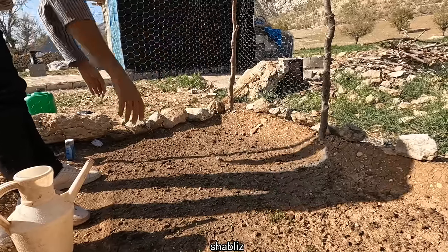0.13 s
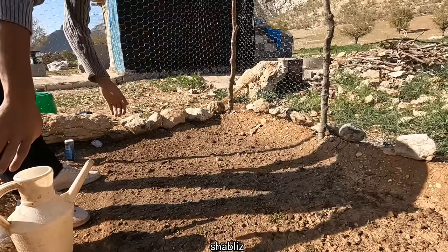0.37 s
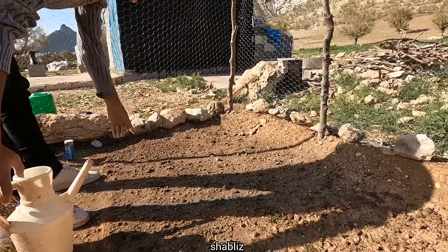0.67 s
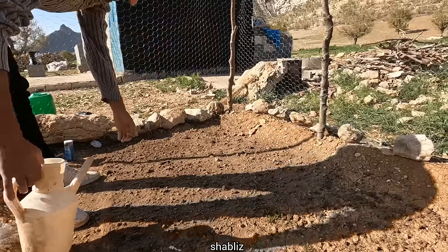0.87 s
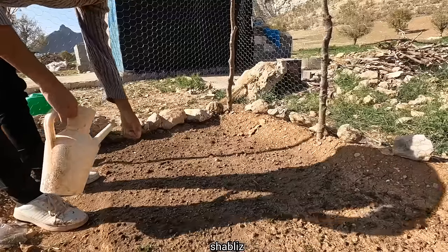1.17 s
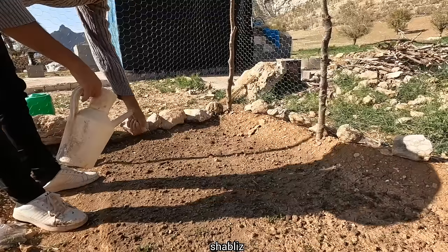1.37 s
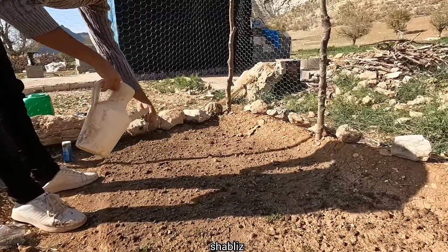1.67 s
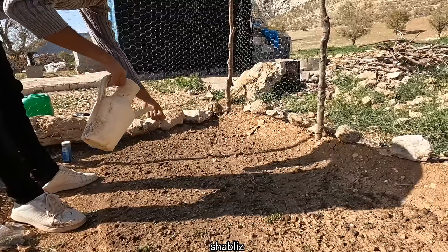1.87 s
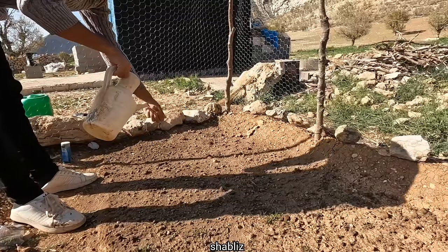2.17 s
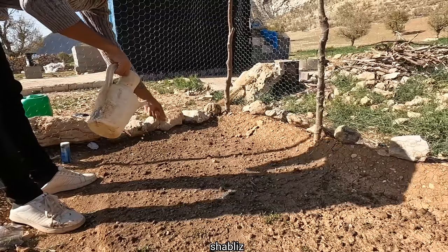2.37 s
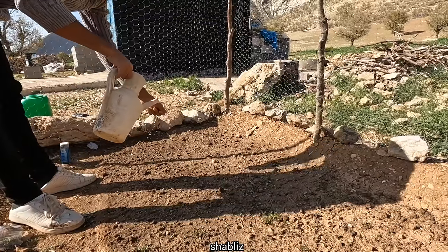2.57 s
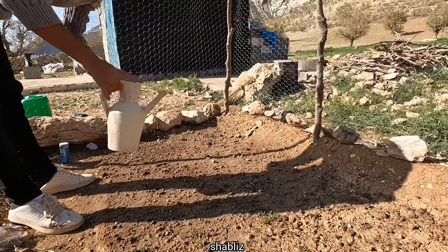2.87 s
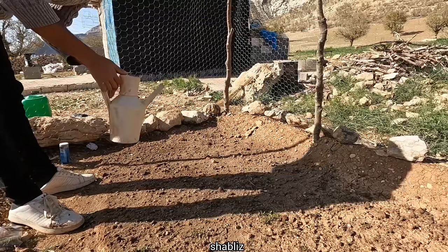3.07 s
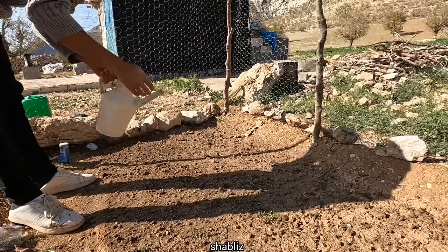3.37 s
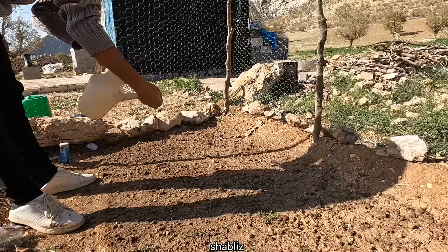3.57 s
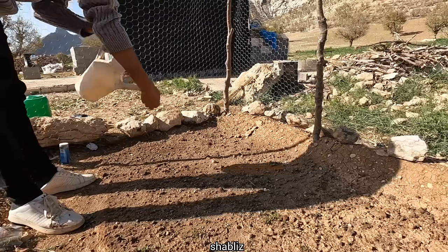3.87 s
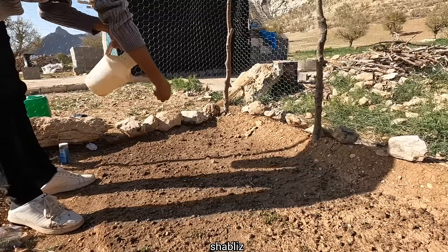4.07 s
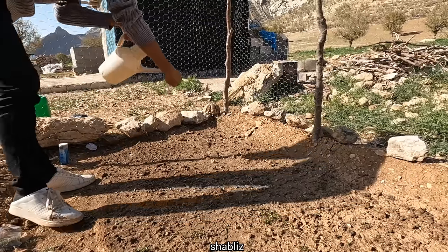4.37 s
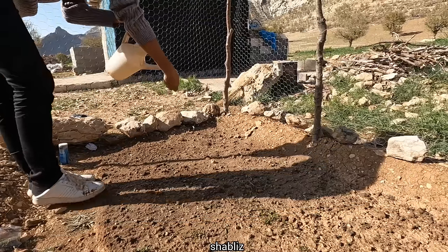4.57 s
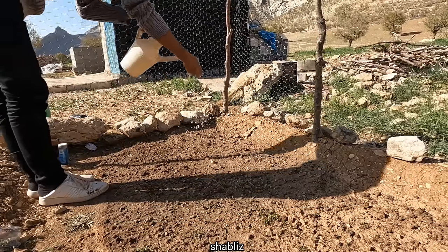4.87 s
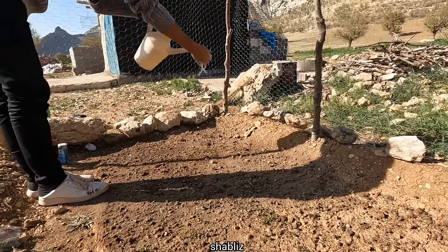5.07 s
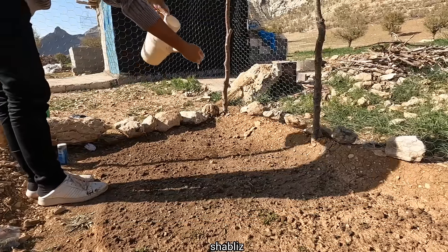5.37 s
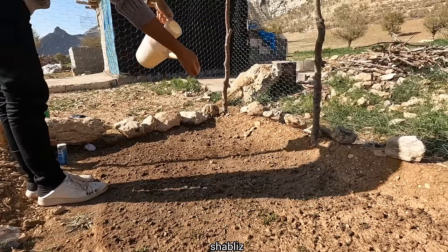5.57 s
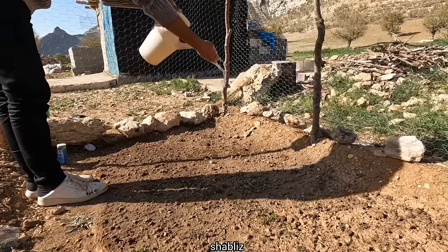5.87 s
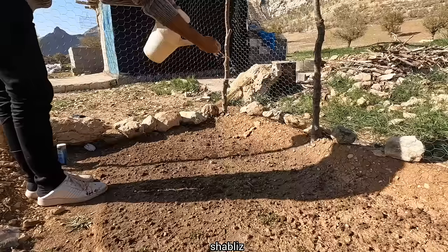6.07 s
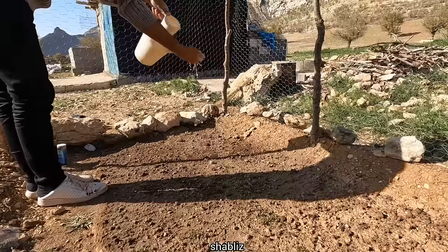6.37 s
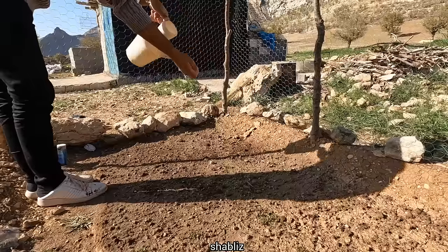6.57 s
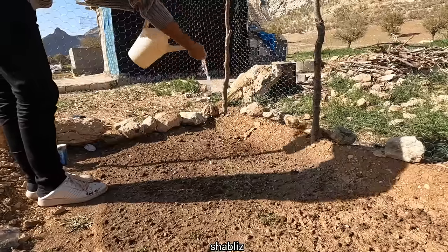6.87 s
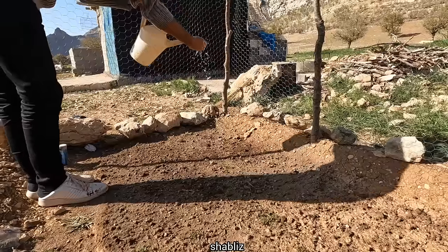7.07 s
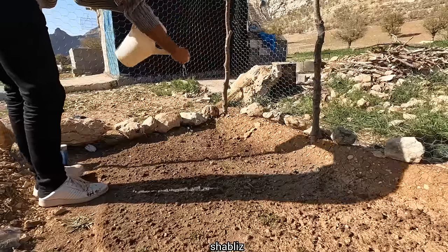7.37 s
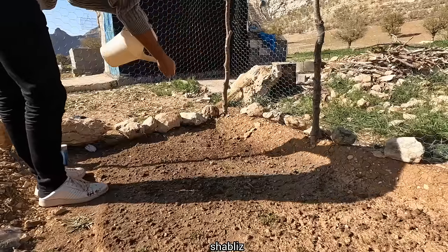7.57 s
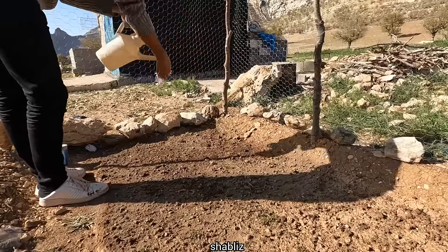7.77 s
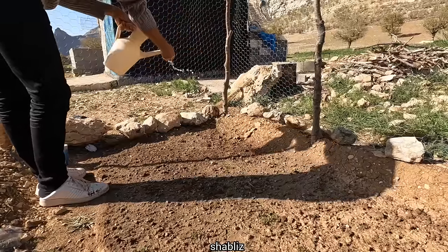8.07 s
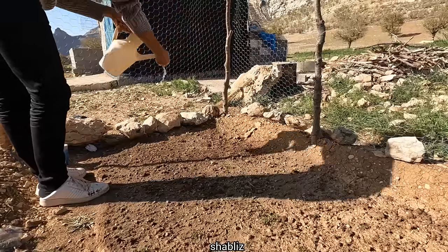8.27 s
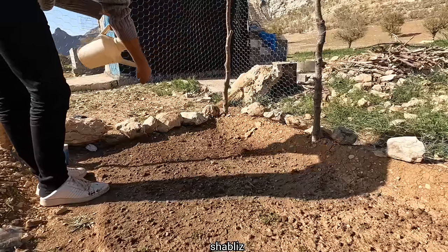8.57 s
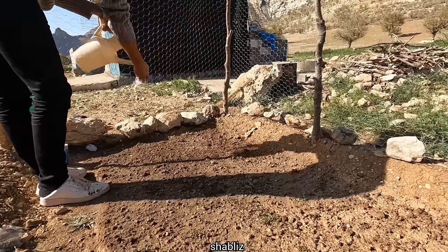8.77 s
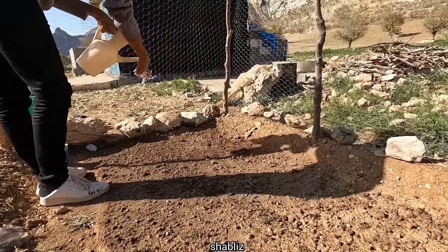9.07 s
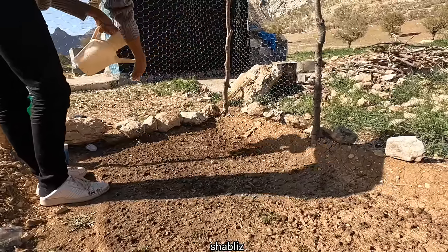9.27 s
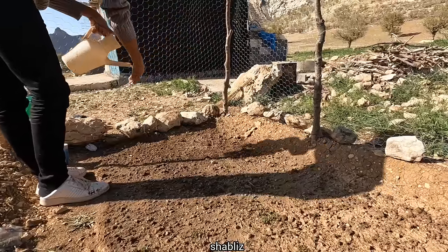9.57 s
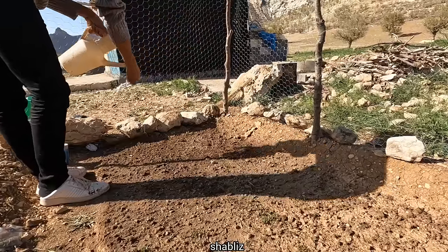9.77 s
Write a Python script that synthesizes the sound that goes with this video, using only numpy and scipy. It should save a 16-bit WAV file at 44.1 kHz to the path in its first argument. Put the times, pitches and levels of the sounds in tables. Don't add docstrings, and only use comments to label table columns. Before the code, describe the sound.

Water sprinkled in handfuls from a plastic jug patters and smacks on dry dug soil, with hollow jug knocks and low wind buffeting.

```python
import sys
import numpy as np
from scipy import signal
from scipy.fft import rfft, irfft, next_fast_len
from scipy.io import wavfile
from scipy.ndimage import uniform_filter1d

SR = 44100
rng = np.random.default_rng(int(sys.argv[2]) if len(sys.argv) > 2 else 0)


def elevation(decibels):
    levels = np.asarray(decibels, float)
    return 10 ** (levels / 20)


def transcribe(u):
    v = np.clip(np.atleast_2d(u).T, -1, 1)
    q = np.round(v * 32767).astype(np.int16)
    wavfile.write(sys.argv[1], SR, q)


N = 437913

# frequency_hz, level_db per Hz
IMPACT_SPECTRUM = [(1000, -19.5), (2700, -5), (4500, -1.5), (6500, -2.5), (7800, -0.5), (8500, -9.5),
                   (9200, -19.5), (10300, -13), (11200, -21.5), (12300, -16), (13500, -25.5), (15200, -71),
                   (16500, -80)]
# start_s, length_s, fine_patter_db, coarse_over_fine_db
HANDFULS = [(1.916, 0.17, -68, -12), (2.167, .13, -66.5, -13.5), (2.415, 0.175, -65, -11),
            (2.65, 0.071, -65.5, -12.5), (2.825, 0.34, -63.5, -11.5), (3.198, .12, -56.5, -7),
            (3.361, .14, -55.5, -11.5), (3.52, 0.4, -62, -19.5), (4.349, 0.2576, -66, -2.5),
            (4.75, 0.074, -58, -8.5), (4.86, 0.37, -59.5, -14.5), (5.35, .06, -70, -9),
            (5.47, 0.051, -64.5, -10), (5.559, 0.043, -72.5, -20), (5.791, 0.36, -64.5, -7),
            (6.198, 0.078, -58.5, -5.5), (6.331, .14, -64, -8.5), (6.509, 0.076, -65.5, -15),
            (6.661, 0.085, -64, -9), (6.82, 0.14, -57, -17.5), (7.18, .14, -60.5, -9.5),
            (7.388, .04, -65, -7), (7.5, 0.119, -63, -7.5), (7.7, .35, -64, -12), (8.07, .38, -62.5, -8),
            (8.569, 0.19, -66, -11), (8.86, 0.21, -66.5, -14), (9.131, 0.18, -62.5, -10),
            (9.357, .26, -57.5, -7.5), (9.661, 0.23, -65.5, -11)]
LAND_S = 0.03
SEEP_START_S = 4.36


def at_hz(points, hz):
    points_hz, level = np.transpose(points)
    return np.interp(np.log(np.maximum(hz, 1)), np.log(points_hz), level)


def rms_one(x):
    return x / np.sqrt(np.mean(x ** 2) + 1e-20)


def band(x, low_hz, high_hz, order=2):
    return signal.sosfilt(signal.butter(order, [low_hz, high_hz], "band", fs=SR, output="sos"), x)


def coloured(x, spectrum):
    size = next_fast_len(N)
    gain = elevation(at_hz(spectrum, np.fft.rfftfreq(size, 1 / SR)))
    return irfft(rfft(x, size) * gain, size)[..., :N]


def drift(rate_hz):
    r = np.exp(-2 * np.pi * rate_hz / SR)
    noise = rng.standard_normal(N + SR)
    return rms_one(signal.lfilter([1], [1, -2 * r, r * r], noise)[SR:])


def resonate(x, hz, width_hz):
    r = np.exp(-np.pi * width_hz / SR)
    return signal.lfilter([1, 0, -1], [1, -2 * r * np.cos(2 * np.pi * hz / SR), r * r], x)


def add(out, start_s, burst, peak_db):
    i = max(round(start_s * SR), 0)
    out[i:i + len(burst)] += (elevation(peak_db) * burst / np.abs(burst).max())[:N - i]


def stretch(coarse):
    return np.interp(np.arange(N) / 64, np.arange(len(coarse)), coarse)


def grains(per_s, spread_db, low_hz, high_hz, cycles):
    sizes = elevation(spread_db * np.minimum(rng.exponential(1, (2, N)), 5))
    signed = sizes * rng.choice([-1, 1], (2, N))
    born = signed * (rng.random((2, N)) < per_s / SR)
    dealt = rng.integers(0, 14, (2, N))
    pitches = np.geomspace(low_hz, high_hz, 14)
    out = sum(resonate(born * (dealt == k) + 1e-18, hz, hz / cycles) for k, hz in enumerate(pitches))
    return out / np.sqrt(uniform_filter1d(out ** 2, size=8000) + 1e-12)


def open_air():
    # frequency_hz, level_db per Hz
    air_spectrum = [(90, -26), (150, 7), (340, -2), (700, -12.5), (1300, -12.5), (3000, -25.5),
                    (5500, -22.5), (7600, -15.5), (8500, -29.5), (9300, -32), (12500, -38), (14500, -44),
                    (16500, -87)]
    noise = rms_one(coloured(rng.standard_normal((2, N)), air_spectrum))
    return elevation(-68 + 1.8 * drift(7)) * noise


def gusts():
    # peak_s, buffet_db, fade_s (time to fall by 10 dB), flutter_over_buffet_db
    gust_table = [(.16, -40.5, .12, -21), (.42, -44, 0.04, -24), (.9, -36, .1, -23.5),
                  (1.12, -46.5, 0.01, -16), (1.45, -36.5, 0.08, -18.5), (1.68, -42, 0.25, -30.5),
                  (1.92, -31.5, 0.1, -24), (2.08, -28.5, 0.08, -11), (2.5, -42.5, .2, -13),
                  (2.85, -38.5, 0.27, -16), (3.11, -33, 0.02, -5), (3.28, -41.5, 0.08, -11.5),
                  (3.57, -39, 0.1, -25), (3.72, -35, 0.1, -23), (4.1, -46, 0.4, -17.5),
                  (4.92, -42.5, 0.13, -12), (5.28, -44, 0.17, -11), (5.47, -27, .08, -14),
                  (5.68, -26.5, 0.0351, -3.5), (5.78, -24.5, 0.0725, -13.5), (6.16, -30.5, 0.12, -14),
                  (6.311, -25, 0.086, -7), (6.6, -41, 0.1, -20), (7.27, -28.5, 0.11, -16),
                  (8.25, -36, 0.1034, -10.5), (8.47, -24, .04, -22), (8.68, -38, .08, -12),
                  (9.16, -35, 0.0875, -14), (9.52, -26, .08, -15), (9.76, -36.5, 0.1419, -24)]
    t = np.arange(0, N + 64, 64) / SR
    buffet, flutter = elevation(-54), elevation(-76)
    for peak_s, db, fade_s, flutter_db in gust_table:
        swell = elevation(db - 10 * np.abs(t - peak_s) / fade_s)
        buffet = np.hypot(buffet, swell)
        flutter = np.hypot(flutter, swell * elevation(flutter_db))
    return stretch(buffet), stretch(flutter)


def wind():
    # centre_s, peak_db, width_s
    eddies = [(2.5, -35.5, 0.0031), (3.089, -27, 0.00461), (4.91, -32.5, 0.0051), (5.671, -22, 0.0042),
              (5.703, -27, 0.00188), (6.066, -42, 0.0013), (6.139, -23.5, 0.0074), (6.282, -19, 0.00445),
              (6.324, -20, 0.0032), (7.36, -35, 0.0031), (8.07, -44, .003), (8.245, -38, .002),
              (8.352, -36, .004), (8.595, -44, .002), (9.525, -36, .002), (5.455, -26, .006),
              (8.724, -35.5, 0.00205)]
    buffet_gain, flutter_gain = gusts()
    pan_db = -5.0 + 0.86 * drift(2.04)
    lumps, flutter = rng.standard_normal((2, 2, N + SR))
    lumps = band(band(lumps, 16, 48), 10, 60)[:, SR:]
    lumps /= np.sqrt(uniform_filter1d(lumps ** 2, size=9000))
    flutter = band(flutter, 55.0, 120.0, order=3)[:, SR:]
    flutter = flutter * (1 + .5 * lumps ** 2) * elevation(2.5 * drift(9))
    shared, own = buffet_gain * lumps + flutter_gain * rms_one(flutter)
    for centre_s, db, width_s in eddies:
        u = np.arange(-.04, .04, 1 / SR) / width_s
        add(shared, centre_s - .04, -u * np.exp(-u ** 2), db)
    left = elevation(pan_db / 2) * (shared + .25 * own)
    right = elevation(-pan_db / 2) * (shared - .25 * own)
    return np.array([left, right])


def brushes():
    # start_s,
    # length_s, level_db, lowest_hz
    strokes = [(0.194, .025, -72, 5500), (1.09, .08, -74, 4500), (1.28, .19, -78, 5000),
               (1.42, .012, -68, 900), (2.7, .05, -66, 5500), (.425, 0.018, -77, 1000),
               (1.58, 0.065, -74.5, 4500), (1.72, .035, -74, 5500), (0.688, 0.051, -53.5, 1000),
               (0.739, 0.12, -48, 1160), (0.869, 0.075, -58.5, 1260), (0.945, 0.09, -53.5, 980),
               (1.036, 0.062, -65.5, 1000), (1.17, 0.09, -61, 1180), (1.476, 0.0336, -53.5, 900),
               (3.026, 0.022, -43.5, 2500), (3.247, 0.047, -47, 892), (3.356, 0.15, -55, 3300),
               (3.505, 0.226, -66.5, 3780), (3.717, 0.29, -66.5, 5550), (6.825, 0.14, -55.5, 1820),
               (7.914, 0.0664, -64, 4059), (9.167, 0.0543, -55.5, 2000), (9.574, 0.11, -60, 2520)]
    out, t = np.zeros((2, N)), np.arange(N) / SR
    scratch = coloured(grains(8000, 2.5, 900, 14000, 16), IMPACT_SPECTRUM) * elevation(1.5 * drift(40))
    for s, length, db, low_hz in strokes:
        i, j = round(s * SR), round((s + length + 0.15) * SR)
        onset = np.clip((t[i:j] - s) / 0.01556, 0, 1)
        decay = elevation(-60 * np.maximum(t[i:j] - s - length, 0) / 0.06)
        out[:, i:j] += elevation(db) * onset * decay * rms_one(band(scratch[:, i:j], low_hz, 21000))
    return out


def jug_wall():
    # start_s, peak_db, contact_hz, t60_s
    knocks = [(.02, -51.5, 510, 0.14), (.77, -51.5, 545, 0.66), (1.481, -50.5, 1480, 0.19),
              (2.527, -52, 840, 0.05), (2.976, -27, 1735, 0.073), (2.979, -31.5, 614, 0.17),
              (3.036, -29, 1040, 0.12), (3.035, -35, 4300, 0.11), (3.114, -38.5, 1594, 0.17),
              (3.161, -43, 1490, 0.092), (3.419, -48, 450, 0.145), (3.652, -48.5, 1490, 0.11),
              (4.362, -38, 1950, 0.039), (4.793, -48, 535, 0.094), (5.485, -51.5, 970, 0.18),
              (6.666, -50, 613, 0.0208), (6.775, -37.5, 1570, 0.113), (6.78, -43, 640, 0.16),
              (7.523, -43, 564, 0.195), (7.76, -47, 1090, 0.084), (8.177, -27.5, 1200, 0.097),
              (8.726, -41.5, 337, 0.104), (8.844, -44, 540.3, 0.035), (9.185, -33.5, 1810, 0.12),
              (9.392, -48.5, 1000, 0.35), (9.593, -41, 540, 0.04), (9.912, -47, 728, 0.13)]
    # mode_hz, width_hz, level_db
    modes = [(365, 200, -3), (450, 160, 11), (614, 35, 5), (776, 14, -17), (1028, 27, 3), (1200, 107, 5.5),
             (1450, 120, 7.5), (1815, 250, 8), (2230, 40, 8), (2880, 98, 10), (3600, 100, 14),
             (4300, 120, 12), (5050, 90, 14), (5600, 90, 16)]
    out, t = np.zeros(N), np.arange(SR // 3) / SR
    for s, db, hz, t60 in knocks:
        shake = band(rng.standard_normal(len(t)), 0.5 * hz, 1.48 * hz, order=3)
        shake = shake * elevation(-60 * t / max(0.75 * t60, .02)) * np.minimum(t / 0.0018, 1)
        wall = sum(resonate(shake, mode_hz, width) * np.sqrt(width) * elevation(mode_db)
                   for mode_hz, width, mode_db in modes)
        add(out, s - .002, .5 * rms_one(shake) + rms_one(wall), db)
    return out


def jug_air():
    # start_s, peak_db, pitch_hz, t60_s, bend_hz
    hums = [(0.781, -52.5, 208, 0.27, 5.0), (0.952, -49.5, 218, 0.39, -5.0), (2.52, -35, 218, 0.5, -9.0),
            (2.523, -51, 640, .1, 400.0), (8.18, -47, 1044, .12, 5.0), (5.483, -55, 1020, .1, -40.0),
            (2.982, -36, 226, 0.52, -7.0), (6.778, -52, 197.3, 0.39, -5.0), (6.791, -46.5, 153, 0.163, 4.0),
            (7.848, -48, 193.7, 0.22, 5.0), (8.19, -46, 215, 0.15, -3.0), (9.209, -33.5, 198, 0.52, -4.0),
            (9.39, -48, 195, .4, 5.0), (9.655, -54, 490, .07, 10.0), (9.242, -35, 105, 0.2, 55.0),
            (8.73, -48, 320, .14, 100.0)]
    out, t = np.zeros(N), np.arange(SR // 3) / SR
    for s, db, hz, t60, bend_hz in hums:
        slosh = rms_one(band(rng.standard_normal(len(t)), 0.03 * hz, 0.13 * hz))
        pitch_hz = hz * (1 + .012 * slosh) + bend_hz * (1 - np.exp(-t / 0.025))
        tone = np.sin(2 * np.pi * np.cumsum(pitch_hz) / SR) * elevation(1.6 * slosh[::-1])
        envelope = np.sqrt(1 - 3 * t) * elevation(-60 * t / t60) * (1 - np.exp(-t / .015))
        add(out, s, tone * envelope, db)
    return out


def gurgles():
    # start_s, length_s, level_db, pitch_hz
    strings = [(2.193, 0.056, -68, 1900), (2.24, 0.046, -70, 2060), (2.46, 0.085, -67, 2130),
               (4.384, 0.073, -60, 2270), (4.5, 0.035, -59, 2268), (4.565, 0.085, -61, 2340),
               (4.74, 0.01, -58.5, 2200), (4.878, 0.02, -55.5, 3886), (4.946, 0.0172, -63.5, 4390),
               (5.974, 0.088, -67, 2640), (6.107, 0.0078, -64, 2805), (6.273, 0.0111, -59, 2463),
               (6.863, .015, -56, 2350), (6.892, .015, -51, 3600), (6.906, .025, -53, 2211),
               (6.934, 0.007, -46.5, 2530), (8.23, 0.0105, -61, 4550), (8.243, 0.008, -61, 3190),
               (4.692, .02, -67, 2200)]
    fizz_tail_s = .015
    out, t = np.zeros(N), np.arange(500) / SR
    for s, length, db, hz in strings:
        for at, size, strength in rng.random((16, 3))[:3 + round(length * 170)]:
            cycles = np.cumsum(hz * (.85 + .3 * size + 8 * t)) / SR
            ring = np.sin(2 * np.pi * cycles) * t * np.exp(-t / .0011)
            add(out, s + at * length, ring, db + 8.5 - 12 * strength)
        span = round((length + fizz_tail_s) * SR)
        fizz = rng.standard_normal(8000)[:span] ** 3 * np.hanning(span) ** .6
        fizz = resonate(resonate(fizz, hz, 1300), hz, 1300)
        add(out, s - fizz_tail_s / 4, fizz, db + 6)
    return out


def handfuls():
    t = np.arange(0, N + 64, 64) / SR
    fine, coarse = (t > SEEP_START_S) * elevation([[-75], [-80.5]])
    for s, length, db, coarse_db in HANDFULS:
        drain_db = 123 * np.maximum(t - s - length, 0)
        fall = np.clip((t - s) / LAND_S, 0, 1) * elevation(db - drain_db)
        fine = np.hypot(fine, fall)
        coarse = np.hypot(coarse, fall * elevation(coarse_db))
    return stretch(fine), stretch(coarse)


def spray():
    fine_gain, coarse_gain = handfuls()
    clumps = 1.3 * drift(16)
    top = grains(2500, 3.5, 5500, 14000, 9) * elevation(2.5 * clumps + 2.5 * drift(25))
    middle = grains(900, 4.0, 2500, 5500, 9) * elevation(2.5 * clumps + 3.5 * drift(25))
    coarse = grains(600, 3.5, 1100, 3300, 4.0) * elevation(1.5 * clumps + 2.5 * drift(25))
    return rms_one(coloured(top + 0.36 * middle, IMPACT_SPECTRUM)) * fine_gain + coarse * coarse_gain


def all_drops():
    # start_s, peak_db, bubble_hz
    heavy = [(2.0898, -33.5, 5010), (2.6768, -33, 6370), (2.979, -33, 2270), (3.0357, -30.5, 6790),
             (1.885, -54, 1900), (2.098, -42, 2600), (2.1, -47, 1400), (2.622, -50, 2900),
             (2.705, -52, 2100), (2.755, -56, 2700), (5.842, -45, 2700), (6.045, -52, 3000),
             (7.352, -50, 2100), (7.405, -50, 1400), (7.88, -48, 2500), (9.25, -52, 1800),
             (9.043, -42, 2700), (8.305, -48, 2400), (3.238, -28.5, 5030), (9.2743, -40.5, 3920),
             (5.022, -23.5, 5007), (5.1221, -35.5, 7280), (5.1291, -27.5, 2220), (5.835, -30.5, 6750),
             (6.2486, -30, 7380), (6.266, -35.5, 7400), (6.3497, -32, 6655), (6.4, -33.5, 4550),
             (6.4614, -23.5, 5140), (6.692, -38.5, 5020), (7.196, -36, 6450), (7.235, -32, 7620),
             (7.2824, -35, 5800), (7.653, -20.5, 6370), (8.092, -38.5, 4840), (8.361, -42, 2960),
             (8.413, -34.5, 4500), (8.444, -34, 4800), (8.5887, -29, 3980), (9.4308, -21, 5210),
             (9.5268, -31.5, 4220), (9.5767, -32, 7320), (9.5959, -24, 6940), (9.7657, -30, 6240)]
    # start_s, peak_db
    droplets = [(1.8776, -49.5), (2.612, -39.5), (3.113, -38), (4.5672, -38.5), (9.3639, -42),
                (4.7982, -38.5), (5.1032, -36.5), (5.1624, -38), (5.246, -39), (5.359, -44), (5.391, -46.5),
                (8.947, -43.5), (6.0795, -44), (6.23, -37.5), (6.7353, -40), (7.2436, -37.5), (7.313, -46),
                (7.5373, -39), (7.5576, -38), (7.594, -39), (7.741, -42.5), (7.8437, -38.5),
                (8.3062, -41.5), (8.457, -35.5), (8.6276, -36.5), (8.7282, -36.5), (8.7387, -39),
                (9.043, -37), (9.405, -43), (9.459, -33), (6.533, -44), (6.453, -45), (6.667, -47),
                (7.668, -44), (5.172, -42), (4.72, -53), (5.604, -50), (7.04, -47), (6.215, -44)]
    # start_s, peak_db, bubble_hz
    more_drops = [(1.3185, -55, 7420), (2.2433, -43, 7020), (2.5869, -54, 5410), (2.8976, -44, 6880),
                  (2.9268, -44, 6220), (2.9532, -47, 3870), (3.0861, -43, 7460), (3.2734, -37, 5860),
                  (3.3905, -40, 6970), (3.7532, -43, 7400), (4.3647, -47, 7660), (4.4015, -46, 5520),
                  (4.4239, -42, 5660), (4.517, -45, 7470), (4.6046, -39, 6100), (4.7676, -46, 4030),
                  (4.8736, -45, 7680), (4.9227, -43, 6490), (4.981, -40, 7080), (5.077, -43, 6570),
                  (5.2314, -44, 6650), (5.5198, -44, 6920), (5.5769, -44, 6720), (5.5895, -43, 6990),
                  (5.8215, -47, 7250), (5.9167, -44, 6190), (5.9465, -45, 7730), (5.9899, -45, 6020),
                  (6.0482, -51, 5180), (6.1307, -40, 5440), (6.3748, -44, 7330), (6.5583, -45, 7060),
                  (6.5899, -40, 7300), (6.771, -45, 7770), (6.8345, -36, 5970), (7.0196, -40, 6590),
                  (7.4003, -44, 6710), (7.5177, -40, 7560), (7.7003, -45, 6520), (7.8473, -34, 6280),
                  (7.8688, -38, 7450), (8.032, -47, 6620), (8.1983, -40, 7450), (8.3451, -44, 5610),
                  (8.3976, -54, 6410), (8.6483, -43, 7020), (8.759, -45, 6810), (8.8202, -41, 6460),
                  (8.8681, -45, 6350), (8.8959, -45, 5820), (9.0716, -40, 7050), (9.1771, -44, 6970),
                  (9.2999, -41, 6320), (9.3421, -51, 5220), (9.3866, -39, 6180), (9.4802, -39, 7390),
                  (9.4969, -33, 6050), (9.5154, -42, 6810), (9.5573, -44, 6810), (9.7903, -43, 7290)]
    light = [(s, db) for s, db in droplets]
    for s, length, db, _ in HANDFULS:
        strays = round(length / 0.12) * (s >= SEEP_START_S - LAND_S)
        for at, size in rng.random((12, 2))[:strays]:
            light.append((s + at * length, db + 9.5 + 3.5 * (2 * size - 1)))
    light_hz = 6785 + 725 * np.clip(rng.standard_normal(500), -2.5, 1.4)
    pitched = [(s, db, hz) for (s, db), hz in zip(light, light_hz)]
    more_pitched = [(s, db - 2.5, hz) for s, db, hz in more_drops]
    return list(heavy) + pitched + more_pitched


def drops():
    smack, thud, t = np.zeros(N), np.zeros(N), np.arange(1500) / SR
    crack_and_splash = elevation(-60 * t / .012) + .12 * elevation(-60 * t / .045)
    splashes = rng.standard_normal((300, 1500)) * crack_and_splash * np.minimum(t / .002, 1)
    dull_splashes = band(splashes, 1400, 3700)
    rise = 1 - np.exp(-t / 0.0009)
    swell = (t / .0007) ** 2 * np.exp(-t / 0.00049)
    for (s, db, hz), splash, dull, patch in zip(all_drops(), splashes, dull_splashes, rng.random(300)):
        bubble = np.sin(2 * np.pi * np.cumsum(hz * (0.33 + 0.82 * rise)) / SR) * swell
        add(smack, s - .0011, bubble, db - 3.0)
        clean_db = 0.4 * (db + 33.0)
        splash = band(splash, (0.4 + .45 * patch) * hz, (1.17 + 1.4 * (1 - patch)) * hz)
        add(smack, s - .002, splash, db - 1.5 - clean_db)
        add(thud, s - .002, dull, db - 6.5 - 0.88 * hz / 1000 - max(clean_db, 0))
    level = np.sqrt(np.mean(band(smack, 1500, 15000) ** 2))
    return rms_one(coloured(smack, IMPACT_SPECTRUM)) * level + thud


def spread(mid, side):
    # frequency_hz, likeness (0 to 1)
    likeness = [(200, 0.66), (1000, 0.56), (5000, 0.89), (9000, 0.935), (13000, 0.22)]
    # frequency_hz, balance_db
    balance = [(300, -8), (1500, -3), (5000, 1.5), (9000, 1), (13000, 6.5)]
    size = next_fast_len(N)
    hz = np.fft.rfftfreq(size, 1 / SR)
    alike = np.clip(at_hz(likeness, hz), 0, 1)
    tilt = elevation(at_hz(balance, hz) / 2)
    mid = rfft(mid, size) * np.sqrt((1 + alike) / 2)
    side = rfft(side, size) * np.sqrt((1 - alike) / 2)
    return irfft(np.array([(mid + side) * tilt, (mid - side) / tilt]), size)[:, :N]


def scene():
    near = drops() + gurgles() + jug_wall() + jug_air()
    duck = np.maximum(gusts()[0] / elevation(-37.5), 1) ** -0.45
    mid, side = (spray() + open_air()) * duck + brushes()
    off_ground = np.roll(near, round(.00012 * SR))
    return wind() + spread(mid + near, side + 0.76 * off_ground)


def top_cut(x):
    return signal.sosfilt(signal.butter(12, 15100, fs=SR, output="sos"), x)


def record(dry):
    return top_cut(dry)


dry = scene()
out = record(dry)
transcribe(out)
```